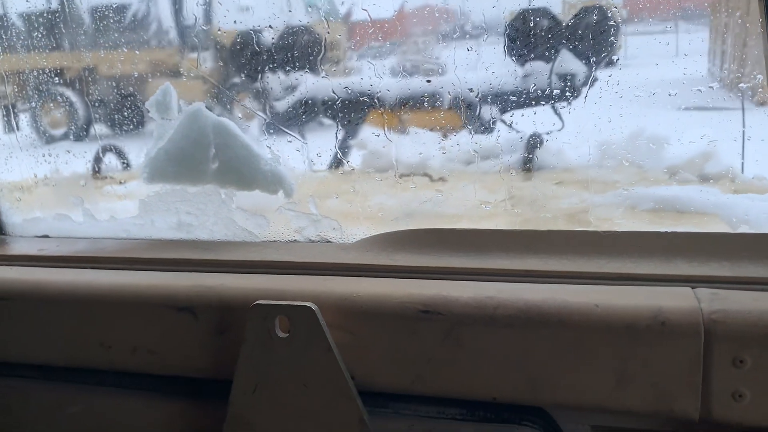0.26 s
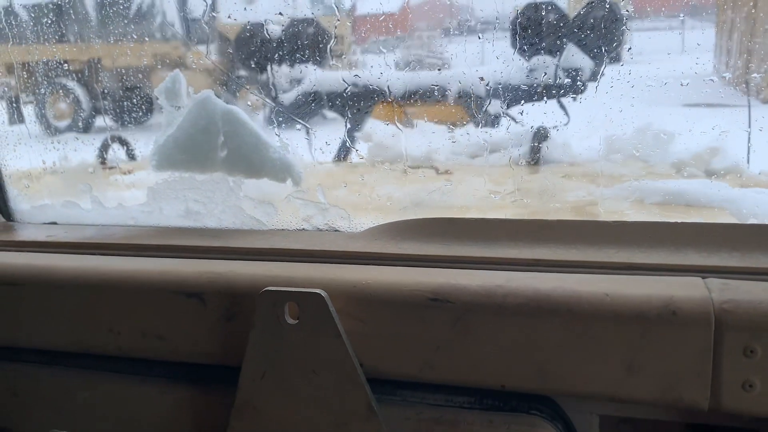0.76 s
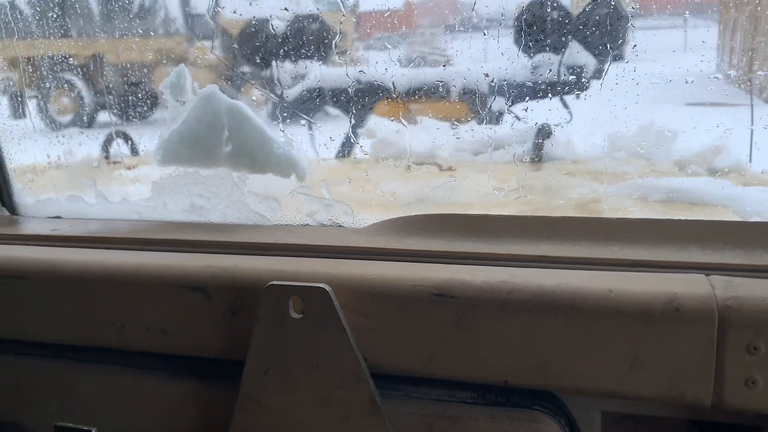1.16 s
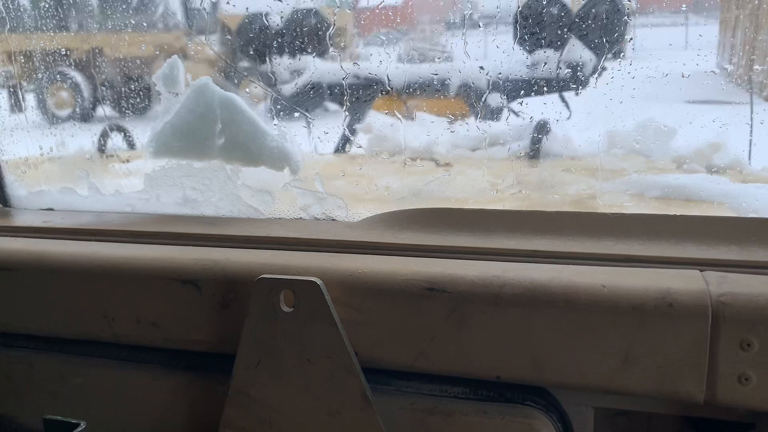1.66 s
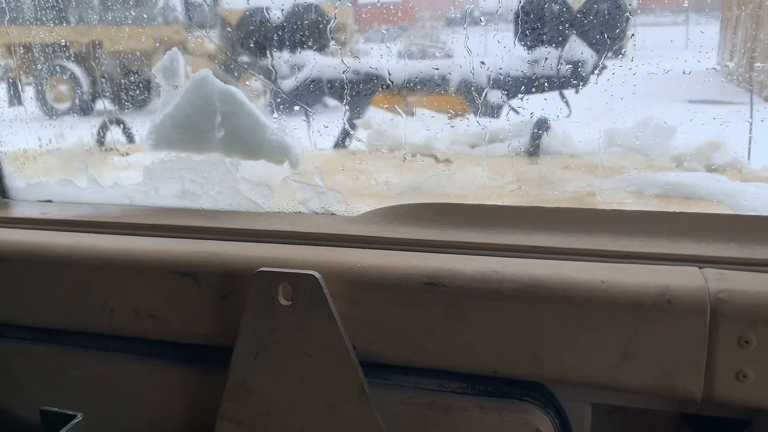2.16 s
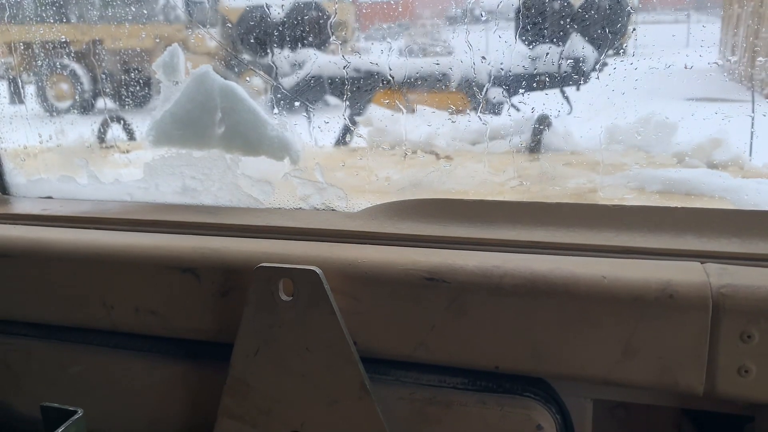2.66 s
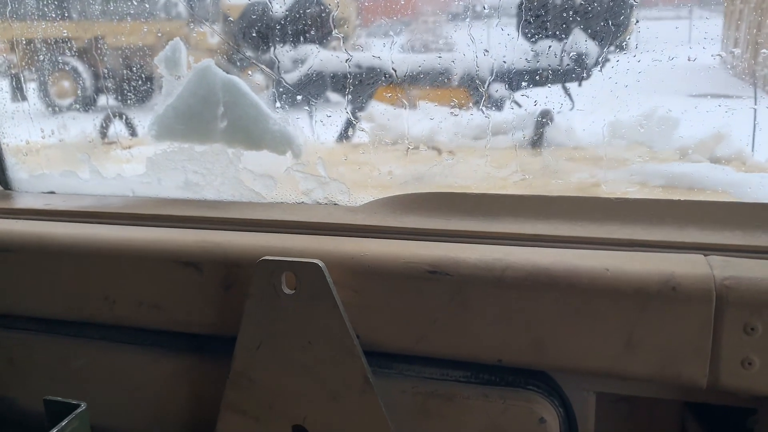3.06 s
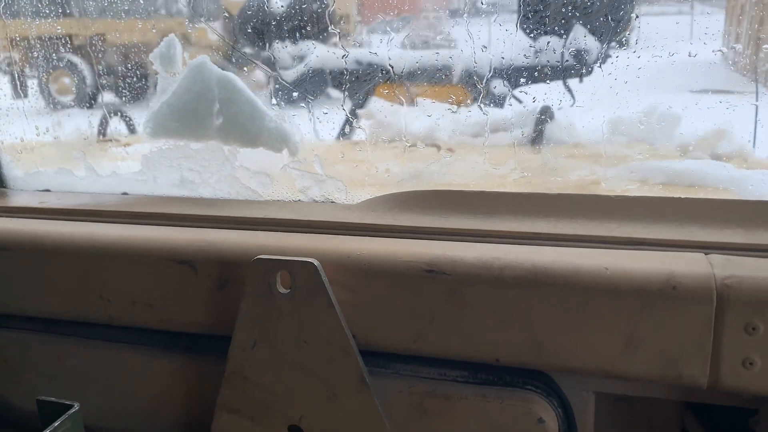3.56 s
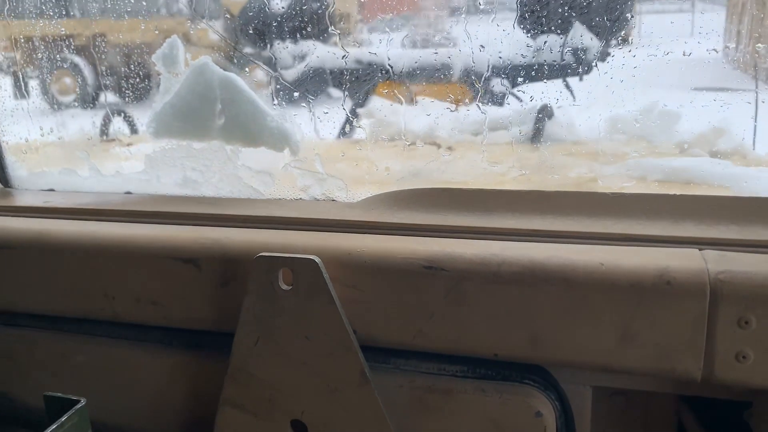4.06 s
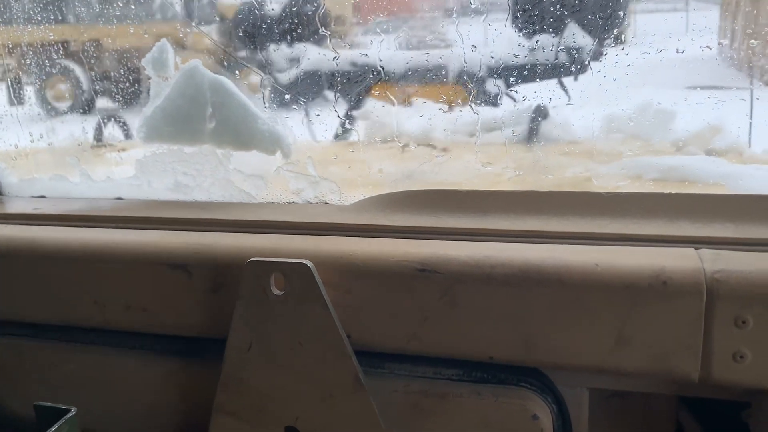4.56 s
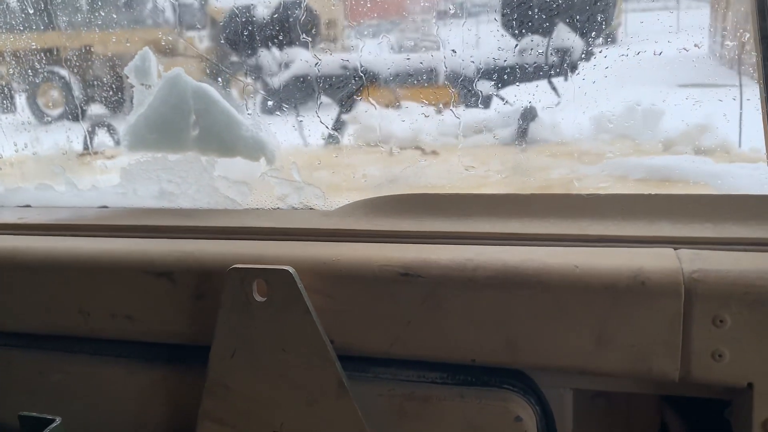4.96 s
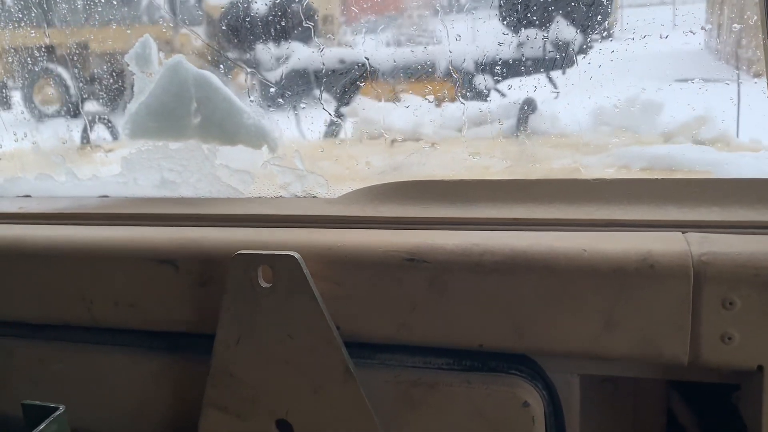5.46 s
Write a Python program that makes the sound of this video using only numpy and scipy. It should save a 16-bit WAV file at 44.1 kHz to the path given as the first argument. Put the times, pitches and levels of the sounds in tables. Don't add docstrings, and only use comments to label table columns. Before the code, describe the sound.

From the first moment a large diesel is already idling, heard in stereo inside a hard steel cab close to the engine. Deep, uneven firing thuds boom in the cab, with a shaking low rumble. A hard, bright metallic knock lands about every quarter second, rattling block and panels, with a duller, softer knock halfway between. Gear and valve clatter fills the gaps, swelling after each knock. The pace sags slightly near 2 s and quickens around 3 s. A loose part snaps sharply at about 2.1 s, then slaps loudly with a hollow clack and floor thud at 3.1 s, with a duller thud at 3.3 s. From about 4.5 s firing weakens and knocks spread apart; a low hum swells as the cab rocks. A last weaker knock comes near 4.9 s, clatter collapses just after 5 s, and one small bright tick at 5.2 s leaves faint low air.

```python
import sys
import numpy as np
from scipy import signal
from scipy.fft import rfft, irfft, next_fast_len
from scipy.io import wavfile
from scipy.ndimage import uniform_filter1d

SR = 44100
rng = np.random.default_rng(int(sys.argv[2]) if len(sys.argv) > 2 else 0)


def volts_from_decibels(level):
    exponent = np.asarray(level, float) / 20
    return 10 ** exponent


def waveform_to_disk(signal):
    frames = np.transpose(np.atleast_2d(signal))
    scaled = np.clip(frames, -1, 1) * 32767
    samples = np.round(scaled).astype(np.int16)
    wavfile.write(sys.argv[1], SR, samples)


N = 251370
TIME_S = np.arange(N) / SR
LOAD_OFF_S, STALL_S = 5.035, 5.072

# start_s (the hard knock), hard_crack_db, soft_crack_db (half a cycle later)
CYCLES = [(0.0949, -15.5, -29), (0.3333, -15.5, -29), (0.5751, -15.5, -31.5), (0.816, -14, -29),
          (1.0595, -16, -28), (1.304, -13.5, -31), (1.5534, -16, -33), (1.8066, -18, -33.5),
          (2.0622, -13.5, -30), (2.3132, -15, -33.5), (2.5504, -18, -27), (2.771, -16, -29),
          (2.9958, -16.5, -22.5), (3.214, -14.5, -24.5), (3.427, -16.5, -30.5), (3.6497, -16.5, -30.5),
          (3.8749, -16.5, -31), (4.1111, -17, -29), (4.349, -17, -33), (4.6349, -16.5, -31.5),
          (4.9428, -22, -45)]


def cycle_marks():
    marks = np.array(CYCLES)[:, 0]
    lead_in = [3 * marks[0] - 2 * marks[1], 2 * marks[0] - marks[1]]
    return np.r_[lead_in, marks, marks[-1] + 0.245]


def overspeed(s):
    marks = cycle_marks()
    return np.interp(s, (marks[1:] + marks[:-1]) / 2, 1 / np.diff(marks)) - 4.1


def driven(idle_db, per_speed_db, lost_db, fall_s, stall_s):
    sunk = 1 - np.exp(-np.maximum(TIME_S - stall_s, 0) / fall_s)
    return idle_db + per_speed_db * overspeed(TIME_S) - lost_db * sunk


# share_of_cycle after the hard knock, pulse_db
FIRINGS = [
    (.038, -2.5),
    (.151, 2.3),
    (.235, -4.2),
    (.396, -4.6),
    (.519, -8.5),
    (.657, -3.7),
    (.791, -1.6),
    (.899, -6.3),
]
# pitch_hz, width_hz, level_db, sign (1 or -1)
CAB = [(39.3, 25, 43, -1), (47.9, 6, 51.5, 1), (74, 5.1, 46, -1), (88, 12, 40, 1), (130, 8, 30, 1)]
# pitch_hz, level_db (per Hz)
RUMBLE = [(25, -8.5), (36, 12.5), (48, 4), (62, 3.5), (100, 0.5), (140, -3.5), (170, -20), (260, -24)]


def boom():
    starved_db = -10.5 * np.clip((TIME_S - 4.47) / 0.24, 0, 1)
    firing_db = driven(-2, -4.2, lost_db=35, fall_s=-6, stall_s=STALL_S) + starved_db
    shaking_db = driven(-21.5, 3.5, lost_db=35, fall_s=0.52, stall_s=LOAD_OFF_S)
    share, pulse_db = np.transpose(FIRINGS)
    marks, lead = cycle_marks(), SR // 3
    times = marks[:-1, None] + share * np.diff(marks)[:, None]
    strength_db = pulse_db + 0.7 * rng.standard_normal(times.shape)
    at = np.round(times.ravel() * SR).astype(int)
    inside = at > -lead
    pulses = np.zeros(N + lead) + 1e-18
    pulses[at[inside] + lead] = volts_from_decibels(strength_db.ravel() + firing_db[np.maximum(at, 0)])[inside]
    pulses = signal.sosfilt(signal.butter(2, 300, fs=SR, output="sos"), pulses)
    rung = sum(sign * volts_from_decibels(db) * resonance(pulses, hz, width) for hz, width, db, sign in CAB)[lead:]
    rumble = volts_from_decibels(shaking_db) * coloured(RUMBLE, alike=0.85)
    return (rung + rumble + rocking()) * volts_from_decibels([[1.0], [-1.0]])


def rocking():
    attack_s, hold_s, release_db_per_s = 0.23, 0.26, 63
    t = TIME_S - 4.564
    swell_in = np.clip(t / attack_s, 0, 1) ** 2
    release_db = release_db_per_s * np.maximum(t - attack_s - hold_s, 0)
    turns = 47.8 * t - 2.2 * t ** 2 / 2
    return swell_in * np.sqrt(2) * volts_from_decibels(-17.5 - release_db) * np.sin(2 * np.pi * turns)


# pitch_hz, width_hz, level_db, side_share (0 alike in both capsules, 1 left only, above 1 opposed)
PANELS = [(195, 11, -6, 0.8), (304.3, 26.2, 0.5, .5), (335, 60, -2, 0.18), (380.3, 15, 0.5, 0.17),
          (439.8, 17, -6.5, 0.75), (554.7, 10.6, 2, -0.75), (640, 25, -3, 0.49), (696, 14, 1, -.5),
          (776.6, 17.6, -3.5, 0.73), (900, 23, -1, -0.6), (987, 19, -2, 1.7), (1372, 16, 0, -.8),
          (1586, 12, -8, -4), (1788, 37, -6, 0.83)]
# pitch_hz, width_hz, level_db, side_share
BLOCK = [(1999, 61, -1, 1.8), (2195, 52, 1.5, -0.42), (2513, 41, -5, 0), (2839, 34, 1.5, 3),
         (3095, 98, -8.5, 1.2), (3284, 67, -2.5, -0.46), (3697, 56, -12.5, 0.5), (4433, 51, -4, -0.1)]
# pitch_hz, level_db (per Hz)
SHAKE = [(150, 0.011), (400, 0.0051), (900, 0.003), (2000, 0.021)]


def knock(share, crack_db, panel_law, colour, crack_t60, rise_s, ring_db):
    marks = cycle_marks()[2:]
    s = marks[:-1] + share * np.diff(marks)
    idle_db, per_speed_db, swing = panel_law
    panel_db = idle_db + per_speed_db * overspeed(s) + swing * (crack_db - np.median(crack_db))
    panel_db = panel_db - 14 * (s > LOAD_OFF_S)

    blow_and_bounces = [(-0.003, 3), (0.008, -14), (0.024, -23.5)]
    blow = sum(clicks(s + lag, volts_from_decibels(crack_db - 5.5 + db)) for lag, db in blow_and_bounces)
    tail = volts_from_decibels(-30.0) * swell(blow, 0.016, 1.0)
    envelope = uneven(500, spread_db=3.8) * (swell(blow, rise_s, crack_t60) + tail)
    crack = coloured(colour, alike=0) * envelope
    struck = coloured(colour, alike=0.47) * envelope
    ringing = volts_from_decibels(ring_db) * body(struck, BLOCK)

    panel_shocks = [(0.001, 1), (0.024, 0.57), (0.04, -2)]
    shocks = sum(clicks(s + lag, volts_from_decibels(panel_db + db)) for lag, db in panel_shocks)
    shaken = coloured(SHAKE, alike=0.6) * swell(shocks, 0.002, 0.09)
    return crack + ringing + body(shaken, PANELS) + volts_from_decibels(-26) * shaken


# pitch_hz, level_db (per Hz)
CRACK = [(500, 10.5), (1000, 5), (2200, -6.5), (3500, -2.5), (5000, -7.5), (7000, -11.5), (10500, -12.5),
         (15500, -18.5), (16600, -54.5)]


def hard_knock():
    crack_db = np.array(CYCLES)[:, 1]
    return knock(0, crack_db, (-17.5, 0.8, 0.6), CRACK, crack_t60=0.07, rise_s=0.0054, ring_db=12.5)


# pitch_hz, level_db (per Hz)
THUMP = [(500, 15), (1400, 3.5), (2150, 2), (2700, -3), (3400, -3), (5000, -10), (7000, -15.5),
         (10500, -15.5), (15500, -37), (16600, -48.5)]


def soft_knock():
    crack_db = np.array(CYCLES)[:, 2]
    return knock(0.494, crack_db, (-18.5, 3.5, 0.66), THUMP, crack_t60=0.094, rise_s=0.002, ring_db=15)


# pitch_hz, level_db (per Hz)
SNAP = [(300, 12), (1500, -6), (5000, 4.5), (10500, 6.5), (15500, 2.5), (16800, -32)]
# pitch_hz, t60_s
SLAP_MODES = [(110, 0.18), (200, .08), (460, 0.045), (1350, 0.048)]
# start_s, snap_db, clack_db, thud_db
SLAPS = [
    (2.072, -4.5, -27.5, -22),
    (3.118, -11, -16.5, -11),
    (3.321, -30, -43, -14.5),
    (3.356, -48, -46, -22.5),
]


def slaps():
    s, snap_db, clack_db, thud_db = np.transpose(SLAPS)
    snap = swell(clicks(s, volts_from_decibels(snap_db)), 0.0054, 0.03)
    out = coloured(SNAP, alike=0.32) * uneven(600, spread_db=1.5) * snap
    levels_db = [thud_db, thud_db - 22.5, clack_db, clack_db]
    lags_s = [0.0063, 0.0043, 0.0033, 0.0012]
    for (hz, t60), level_db, lag in zip(SLAP_MODES, levels_db, lags_s):
        width = np.log(1000) / (np.pi * t60)
        soft = signal.butter(2, 2.5 * hz, fs=SR, output="sos")
        contact = signal.sosfilt(soft, clicks(s + lag, volts_from_decibels(level_db)))
        out = out + resonance(contact, hz, width) * SR / (np.pi * width)
    return out


# pitch_hz, level_db (per Hz)
LOW_CLATTER = [(130, -8.5), (250, -5), (350, -8), (700, -7), (1100, -13.5), (1600, -14.5), (2500, -25.5)]
# pitch_hz, level_db (per Hz)
HIGH_CLATTER = [(1000, -26.5), (2100, -6), (3300, -11), (5000, -16.5), (7000, -19.5), (10500, -22.5),
                (15500, -27), (16600, -40.5)]


def clatter():
    low_db = driven(-28.5, 3, lost_db=45, fall_s=0.28, stall_s=LOAD_OFF_S)
    high_db = driven(-40.5, 4.5, lost_db=60, fall_s=0.02, stall_s=STALL_S)
    marks = cycle_marks()
    turn = 2 * np.pi * np.interp(TIME_S, marks, np.arange(len(marks)))
    twice, once = np.cos(2 * turn - 2.1), np.cos(turn - 1.1)
    low = coloured(LOW_CLATTER, alike=0.85) * uneven(150, spread_db=1.5) * volts_from_decibels(3 * twice + 2 * once)
    low = low + volts_from_decibels(12.5) * body(low, PANELS)
    high = coloured(HIGH_CLATTER, alike=0.15) * uneven(250, spread_db=2.5) * volts_from_decibels(2.5 * twice)
    high = high + volts_from_decibels(7.5) * body(high, BLOCK)
    return volts_from_decibels(low_db - 7) * low + volts_from_decibels(high_db - 4.0) * high


# pitch_hz, level_db (per Hz)
TICK_COLOUR = [(1700, -24), (2400, -4), (4500, -9), (7000, -15), (8000, -34)]
# pitch_hz, width_hz, level_db, side_share
PAWL = [(1950, 40, -4, .3), (2500, 60, 3.5, .3), (2980, 70, -2, -.3), (3800, 90, -3, .4),
        (4740, 40, 0, -.3)]


def tick():
    start_s, level_db = 5.219, -36
    envelope = swell(clicks([start_s], [volts_from_decibels(level_db - 5)]), 0.0015, 0.061)
    burst = coloured(TICK_COLOUR, alike=0.28) * uneven(500, spread_db=2) * envelope
    start = int(start_s * SR)
    burst[:, start:] += volts_from_decibels(13) * body(burst[:, start:], PAWL)
    return burst


# pitch_hz, level_db (per Hz)
STILL = [(28, -4.5), (45, 0.5), (75, 2.5), (130, -28.5), (310, -32.5), (700, -51), (2000, -55), (6000, -81),
         (15500, -65)]


def still_cab():
    return volts_from_decibels(-37.5) * coloured(STILL, alike=0.95)


def coloured(points, alike):
    hz, db = np.transpose(points)
    size = next_fast_len(N)
    grid = np.arange(size // 2 + 1) * SR / size + 1
    gain = volts_from_decibels(np.interp(np.log(grid), np.log(hz), db, left=-90, right=-90))
    mid, side = irfft(rfft(rng.standard_normal((2, size))) * gain, size)[:, :N]
    alike = np.clip(alike, 0, 1)
    out = np.sqrt(1 + alike) * mid + np.sqrt(1 - alike) * side * [[1], [-1]]
    return out / np.sqrt(np.mean(out ** 2))


def clicks(times, heights):
    out, at = np.zeros(N), np.round(np.asarray(times) * SR).astype(int)
    inside = (at >= 0) & (at < N)
    np.add.at(out, at[inside], np.asarray(heights)[inside])
    return out + 1e-18


def swell(x, rise_s, t60):
    up, down = np.exp(-1 / (rise_s * SR)), volts_from_decibels(-60 / (t60 * SR))
    dying = signal.lfilter([1], [1, -down], x)
    return signal.lfilter([1 - up], [1, -up], dying)


def resonance(x, hz, width):
    r = np.exp(-np.pi * width / SR)
    feedback = [1, -2 * r * np.cos(2 * np.pi * hz / SR), r * r]
    return signal.lfilter(np.array([1, 0, -1]) * (1 - r * r) / 2, feedback, x)


def body(x, modes):
    out = 0
    for k, (hz, width, db, side) in enumerate(modes):
        capsules = np.array([[1 + side], [1 - side]]) / np.sqrt(1 + side ** 2)
        out = out + (-1) ** k * volts_from_decibels(db) * capsules * resonance(x, hz, width)
    return out


def uneven(rate, spread_db):
    count = int(N / SR * rate) + 2
    return volts_from_decibels(spread_db * np.interp(TIME_S * rate, np.arange(count), rng.standard_normal(count)))


def scene():
    engine = boom() + hard_knock() + soft_knock() + clatter()
    return engine + slaps() + tick() + still_cab()


def ducking(x):
    threshold_db, ratio, release_db_per_s, attack_s = -21, 0.94, 30.5, 0.03
    bright = signal.sosfilt(signal.butter(2, 3000, "high", fs=SR, output="sos"), x[1])
    level_db = 10 * np.log10(uniform_filter1d(bright ** 2, size=256) + 1e-12)
    ramp = release_db_per_s * TIME_S
    held_db = np.maximum.accumulate(level_db + ramp) - ramp
    over = np.maximum(held_db - threshold_db, 0)
    r = np.exp(-1 / (attack_s * SR))
    return volts_from_decibels(-ratio * signal.lfilter([1 - r], [1, -r], over))


def top_cut(x):
    return signal.sosfilt(signal.butter(12, 16990, fs=SR, output="sos"), x)


def record(dry):
    x = signal.sosfilt(signal.butter(6, 30, "high", fs=SR, output="sos"), dry)
    x = x * ducking(x)
    below = signal.sosfiltfilt(signal.butter(8, 6800, fs=SR, output="sos"), x)
    top = volts_from_decibels(-1.0) * (x[1] - below[1])
    late = np.r_[np.zeros(10), top[:-10]]
    x = below + np.array([-late, top])
    return top_cut(1.166 * np.tanh(x / 0.94))


dry = scene()
out = record(dry)
waveform_to_disk(out)
```